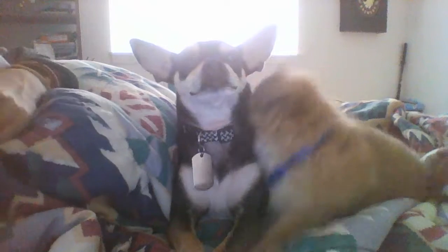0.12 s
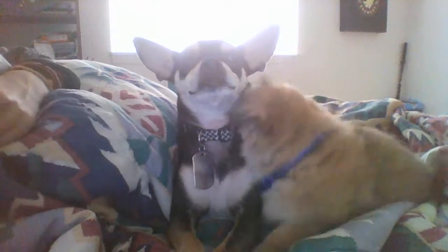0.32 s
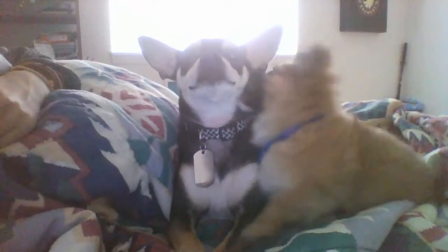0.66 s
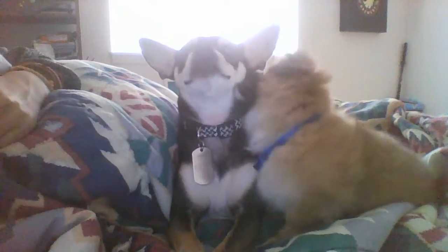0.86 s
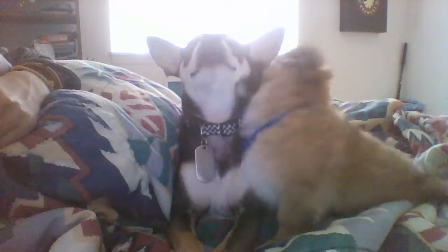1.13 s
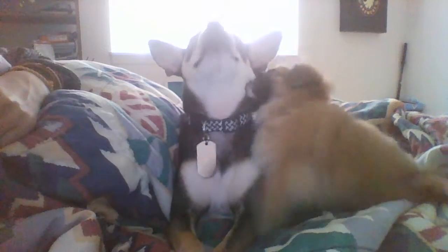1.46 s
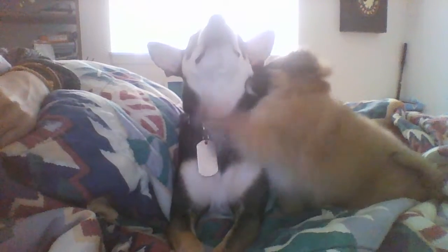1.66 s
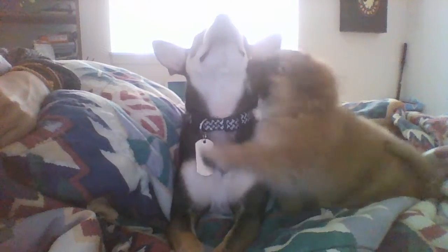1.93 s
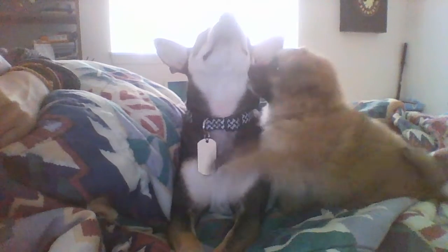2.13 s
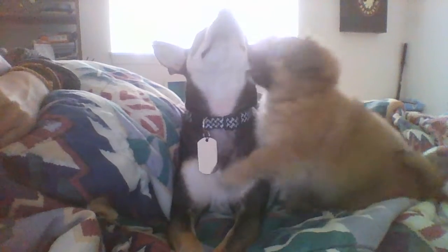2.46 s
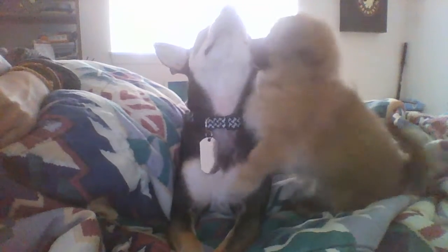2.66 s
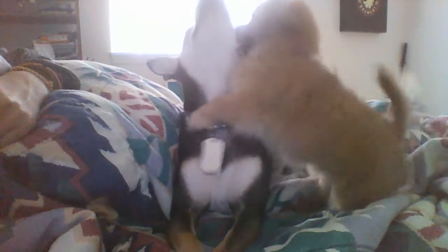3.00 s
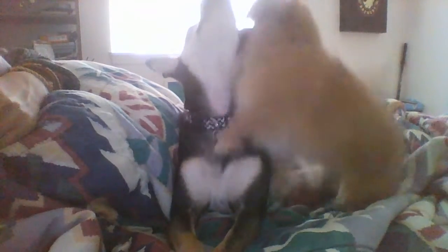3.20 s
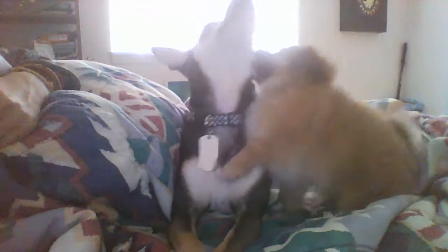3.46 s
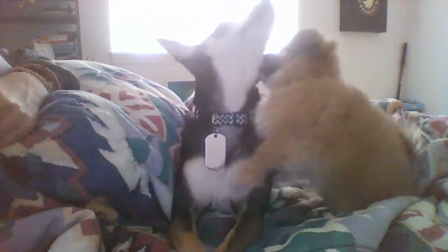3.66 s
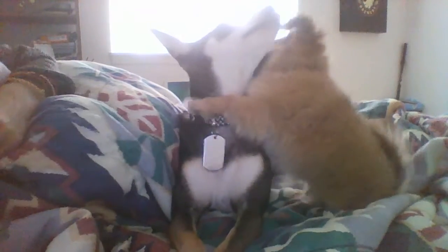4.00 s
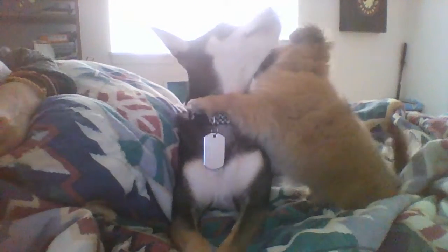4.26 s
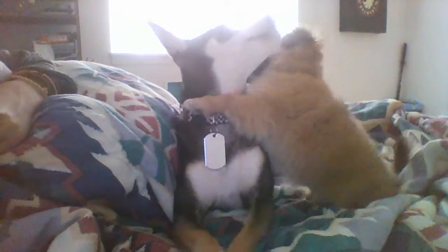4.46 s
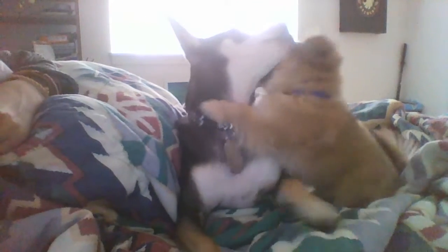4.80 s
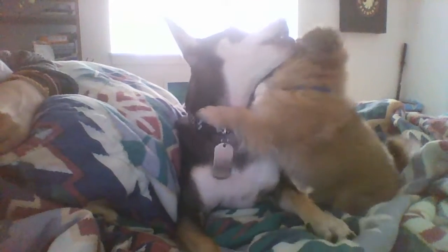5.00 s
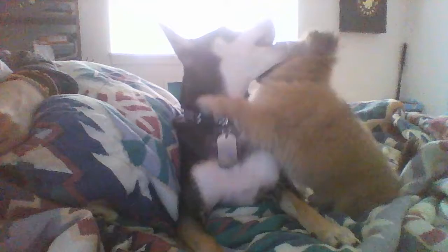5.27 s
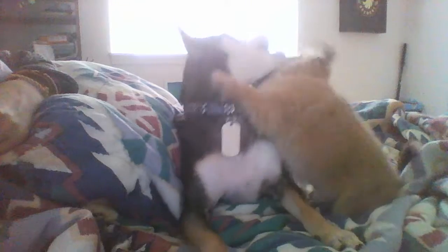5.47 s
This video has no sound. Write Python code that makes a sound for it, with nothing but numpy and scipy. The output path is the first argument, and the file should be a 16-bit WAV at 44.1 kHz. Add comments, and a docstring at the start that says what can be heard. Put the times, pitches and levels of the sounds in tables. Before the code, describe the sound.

Puppy paws thud softly on a bed, then a steel tag jingles hard and briefly amid cloth rustle, snuffling and faint electric whine.

```python
"""Steel tag clinks and bedding

A puppy paws at a dog on a bed, close to a webcam. Low noise rumbles, bedding rustles and paws swing the mattress.
Claws tick as short tone bursts; fur and nose air hiss as coloured noise; a quilt is dragged.
The steel name tag clinks on its ring as decaying plate modes, soon damped by fur.
A faint electric whine beats fifteen times a second; 16 kHz sampling and clipping mark the hardest sounds."""
import sys
import numpy as np
from scipy import signal
from scipy.fft import rfft, irfft, next_fast_len
from scipy.io import wavfile
from scipy.ndimage import uniform_filter1d, map_coordinates

SR = 44100
rng = np.random.default_rng(int(sys.argv[2]) if len(sys.argv) > 2 else 0)


def pcm_store(signal):
    """Save signal as 16-bit PCM."""
    levels = np.round(np.clip(np.atleast_2d(signal), -1, 1) * 32767)
    wavfile.write(sys.argv[1], SR, levels.astype(np.int16).T)


N = 248011


def amp(db):
    """Decibel law: twenty decibels are a factor of ten in amplitude."""
    return 10 ** (np.asarray(db) / 20)


def unit(x):
    """Normalisation to a root-mean-square of 1."""
    return x / np.sqrt(np.mean(x ** 2) + 1e-20)


def along(points, hz):
    """Interpolation of (pitch_hz, value) points along a logarithmic frequency axis."""
    point_hz, value = np.transpose(points)
    return np.interp(np.log(hz + 1), np.log(point_hz + 1), value)


def curves(rows):
    """Linear interpolation in time: one value per sample for each column after start_s."""
    start_s, *columns = np.transpose(rows)
    return [np.interp(np.arange(N) / SR, start_s, column) for column in columns]


def wobble(rate):
    """Slow random modulation: a smooth curve through rate random knots a second."""
    knots = rng.standard_normal(int(N * rate / SR) + 4)
    return map_coordinates(knots, [np.arange(N) * rate / SR])


def filtered(x, response):
    """Linear filtering: the spectrum of x times a response of frequency."""
    m = next_fast_len(N + 8192)
    return irfft(rfft(x, m) * response(np.fft.rfftfreq(m, 1 / SR)), m)[:N]


def noise(spectrum, grain_db, rate, patchy_db):
    """Coloured noise of rms 1: its level flutters, and random gains dapple time and frequency."""
    grains = rng.standard_normal(N) * amp(grain_db * wobble(rate))
    cells = signal.stft(grains, nperseg=512)[2]
    field = uniform_filter1d(rng.standard_normal(cells.shape), size=3, axis=0)
    field = uniform_filter1d(field, size=5, axis=1)
    patchy = signal.istft(cells * amp(patchy_db * unit(field)), nperseg=512)[1][:N]
    return unit(filtered(patchy, lambda hz: amp(along(spectrum, hz))))


def add(track, s, sound):
    """Superposition: mixes a sound into the track at time s."""
    part = track[round(s * SR):][:len(sound)]
    part += sound[:len(part)]


SWELL_BEND = 1.07  # over 1 rounds the top of a swell and steepens its ends


def swell(s, db, rise, fall):
    """Near-exponential growth to a peak at s, then decay; 20 dB per rise or fall time, silent past three."""
    rise, fall, gain = max(rise, .0005), max(fall, .0005), np.zeros(N)
    first = max(round((s - 3 * rise) * SR), 0)
    on = np.arange(first, min(round((s + 3 * fall) * SR), N))
    t = on / SR - s
    gain[on] = amp(db - 20 * np.where(t < 0, -t / rise, t / fall) ** SWELL_BEND)
    return gain


LEAD_S = .025  # from the start of a blip to its peak


def blip(db, hz, half):
    """Tone burst under a Gaussian envelope, slightly rough; half is the time in s to fall to 1/e."""
    t = np.arange(-LEAD_S, LEAD_S, 1 / SR)
    rough = 1 + 1.2 * uniform_filter1d(rng.standard_normal(len(t)), size=25)
    return amp(db) * rough * np.exp(-(t / half) ** 2) * np.cos(2 * np.pi * (hz * t + rng.random()))


# colours of the rumble and of rustling cloth: pitch_hz [Hz], level_db [relative dB per Hz]
RUMBLE_COLOUR = [(18, -64), (30, -29), (70, -28.5), (112, -2), (156, -2), (253, -3.5), (284, -7.5),
                 (331, -2), (373, -12.5), (440, -12), (520, -22), (700, -40), (1100, -120)]
CLOTH_COLOUR = [(300, -35.5), (500, -1.5), (900, -7.5), (1300, -13), (1800, -22), (3000, -32.5)]
# level of the rumble: start_s [s], deep_level_db [dB], upper_level_db [dB]
RUMBLE_LEVELS = [(0.02, -39, -45.5), (0.62, -45.5, -42), (0.89, -37.5, -41), (1.14, -39, -48.5),
                 (1.3, -42, -40.5), (1.57, -49, -50), (1.7, -47, -49), (1.77, -41, -37.5),
                 (1.96, -45.5, -46), (2.3, -47.5, -46), (2.52, -40.5, -38.5), (2.75, -47.5, -48),
                 (2.96, -47, -45), (3.2, -40.5, -44), (3.61, -47, -46.5), (4.12, -50, -53),
                 (4.54, -45, -48.5), (5.15, -49, -49.5), (5.6, -48, -55)]
# rustles as weight shifts: peak_s [s], level_db [dB], rise_20db_s [s], fall_20db_s [s]; times floored by swell
WEIGHT_SHIFTS = [(.22, -48.5, 1.1, .5), (.67, -50, -0.02, .08), (.89, -47.5, 0.23, 0.21),
                 (1.28, -52.5, 0.53, 0.46), (1.52, -58.5, .02, 0.5), (1.728, -46, -0.06, 0.2),
                 (2.0, -56.5, 0.1, .5), (2.38, -52, .02, .2), (2.52, -54.5, 0.04, 1),
                 (2.975, -44, 0.01, 0.1), (3.09, -44.5, 0.09, 0.16), (3.265, -42, 0.1, 0.06),
                 (3.43, -47, 0.04, 0.15), (3.52, -47, 0.09, 0.23), (3.77, -49, 0.1, 0.14),
                 (4.041, -42, .006, .02), (4.058, -42.5, .004, .04), (4.43, -52.5, 0.54, 0.45),
                 (4.6, -46, .1, .05), (4.65, -42, .1, .16), (4.9, -52, .1, 0.37), (5.37, -58, 0.5, 2.5)]
CLOTH_UNDER_DB = -19.5  # the steady rustle lies under the upper rumble
SPLIT_HZ = 220  # between deep and upper rumble


def bed():
    """Band-split noise: a low rumble, with a cloth rustle that follows it and flares when weight shifts."""
    deep, upper = amp(curves(RUMBLE_LEVELS))
    rumble = noise(RUMBLE_COLOUR, grain_db=2.0, rate=18, patchy_db=1.5)
    low = filtered(rumble, lambda hz: 1 / (1 + (hz / SPLIT_HZ) ** 6))
    cloth = amp(CLOTH_UNDER_DB) * upper + sum(swell(*shift) for shift in WEIGHT_SHIFTS)
    rustle = cloth * noise(CLOTH_COLOUR, grain_db=2, rate=60, patchy_db=1.5)
    return deep * unit(low) + upper * unit(rumble - low) + rustle


# strength of the whine, before its random wavering: start_s [s], level_db [rms dB]
WHINE_LEVELS = [(0, -64.5), (.9, -61), (1.6, -67), (2.5, -61.5), (3.4, -68), (4.2, -61), (4.9, -65),
                (5.62, -70)]
# colour of the hiss: pitch_hz [Hz], level_db [relative dB per Hz]
HISS_COLOUR = [(300, -23.5), (700, 2), (1500, 3), (2600, 0.5), (4500, -2.5), (6600, -0.5), (7700, -13.5)]
BEAT_HZ, BEAT_AT_S = 14.97, -.0037  # beats a second, time of one beat's peak


def electronics():
    """Beating by amplitude modulation: a cubed cosine cuts a tone into short beeps over preamp hiss."""
    t = np.arange(N) / SR
    beat = np.cos(np.pi * BEAT_HZ * (t - BEAT_AT_S))
    beeps = beat * np.abs(beat) ** 2 * np.sin(2 * np.pi * 2857 * t + .7 * wobble(40))
    strength = amp(curves(WHINE_LEVELS)[0] + 1.6 * wobble(14))
    hiss = amp(-55.5 + 0.3 * wobble(4.4)) * noise(HISS_COLOUR, grain_db=0.1, rate=48, patchy_db=3)
    return strength * unit(beeps) + hiss


# paws on the mattress: start_s [s], level_db [peak dB], pitch_hz [Hz], length_s [s]
PAW_THUMPS = [(0.166, -25, 254, 0.021), (0.35, -41, 132, 0.018), (0.418, -32.5, 202, 0.039),
              (0.645, -27.5, 132, 0.048), (0.702, -26, 168, 0.028), (0.882, -20.5, 151, 0.032),
              (0.973, -25.5, 150, 0.053), (1.081, -32, 187, 0.057), (1.209, -23.5, 150, 0.028),
              (1.307, -31, 137, 0.042), (1.722, -36, 208, 0.041), (1.792, -24.5, 223, 0.019),
              (2.123, -32.5, 141, 0.04), (2.372, -34, 270, 0.03), (2.475, -30, 131, 0.027),
              (2.883, -33, 155, 0.035), (2.978, -31, 167, 0.031), (3.108, -30, 142, 0.061),
              (3.218, -30.5, 131, 0.054), (3.462, -39.5, 197, 0.06), (3.684, -32.5, 130, 0.035),
              (4.043, -31, 196, 0.014), (4.319, -34.5, 135, 0.059), (4.528, -31.5, 136, 0.061),
              (4.88, -36, 138, 0.064), (5.29, -30.5, 135, 0.039)]


def thumps():
    """Heavily damped oscillation: the mattress swings a few cycles under each paw."""
    out = np.zeros(N)
    for s, db, hz, length in PAW_THUMPS:
        t = np.arange(0, length, 1 / SR)
        envelope = np.sin(np.pi * (t / length) ** 0.56) ** 2  # peaks before the middle
        add(out, s, amp(db) * envelope * np.sin(2 * np.pi * (hz * t + rng.random())))
    return out


# claw and ring ticks and low tag rings, before roughening: peak_s [s], level_db [dB], pitch_hz [Hz],
# half_length_s [s]
SHORT_BURSTS = [(.6435, -30, 6300, .0003), (.6455, -30, 4700, .0012), (.6455, -35, 5400, .0015),
                (.728, -39, 5550, .004), (.728, -47, 2050, .007), (.742, -47, 2000, .006),
                (.738, -49, 3700, .006), (.75, -50, 2600, .006), (.748, -38, 5750, .003),
                (.756, -37, 5350, .004), (.763, -39, 5150, .003), (1.8088, -8, 6800, .0004),
                (3.308, -12, 7300, .0015), (0.769, -31.5, 5200, .002), (1.7229, -19, 4500, .00012),
                (1.813, -19, 3990, 0.0035), (1.83, 0, 6010, 0.00037), (1.8323, -13.5, 5900, .001),
                (1.879, -26.5, 4000, .001), (1.8795, -21, 6000, .0004), (2.3612, -15, 5900, .0006),
                (2.3626, -15, 7000, .0008), (2.3643, -15, 5900, .0005), (2.3779, -7, 5500, .0003),
                (2.3779, -11, 3900, .0004), (2.3779, -24, 2500, .0003), (2.363, -30, 4300, .001),
                (2.387, -27, 4550, .0008), (2.394, -24, 5300, .001), (3.223, -16.5, 5600, .001),
                (3.2262, -13.5, 5800, .001), (3.2279, -17.5, 6220, .0007), (3.2323, -8.5, 5600, .0008),
                (3.237, -9.5, 5450, .001), (3.2514, -19, 4630, .0015), (3.264, -23.5, 4000, .003),
                (3.272, -20, 4050, .003), (3.326, -3.5, 6680, 0.00043), (3.39, -25.5, 6500, .0004),
                (3.75, -35, 6260, .002), (3.761, -36.5, 6240, 0.0027), (4.0363, -35, 5700, .001),
                (4.04, -31.5, 2800, .0005), (4.0455, -31.5, 3600, .0008), (4.0555, -27.5, 2400, .0008),
                (4.0452, -19, 5700, 0.00055), (4.0575, -11, 5600, .001), (4.036, -42, 3000, .0003),
                (4.049, -30, 7300, .002), (4.0453, -25.5, 2350, .0012), (4.418, -33, 5800, .00015),
                (4.67, -39, 4000, .0002)]
# small hollow knocks, before roughening: peak_s [s], level_db [dB], half_length_s [s]
HOLLOW_KNOCKS = [(2.977, -32.5, 0.0022), (3.774, -37.5, .002), (4.039, -28.5, 0.00023),
                 (4.046, -31.5, .001), (4.056, -28, .001), (4.452, -40, 0.0013), (4.643, -29, 0.0059),
                 (4.666, -37, .003), (4.673, -31, .004), (4.723, -48, 0.0027)]
KNOCK_HZ = 1268


def bursts():
    """Impulsive excitation in short bursts: claw and ring ticks, low tag rings, hollow knocks."""
    out = np.zeros(N)
    for s, db, hz, half in SHORT_BURSTS:
        add(out, s - LEAD_S, blip(db, hz, half))
    for s, db, half in HOLLOW_KNOCKS:
        add(out, s - LEAD_S, blip(db, KNOCK_HZ, half))
    return out


# hissing fur strokes, with narrow rings after clinks and a nose resonance: peak_s [s],
# level_db [rms dB at the peak], rise_20db_s [s], fall_20db_s [s], centre_hz [Hz], narrow_share [0-1]
HISSES_AND_RINGS = [(.648, -46, .003, .2, 4800, .4), (.70, -52, .03, .04, 6200, .8),
                    (.735, -42, .03, .06, 5600, .8), (.755, -42, .04, .03, 5350, .8),
                    (.775, -45, .01, .12, 5250, .7), (.828, -54, .03, .07, 4700, .9),
                    (1.735, -42, .006, .08, 5600, .1), (1.825, -41, .012, .2, 4000, 1),
                    (1.91, -48, .05, .2, 4810, 1), (1.93, -50, .05, .08, 6540, 1),
                    (1.838, -36, .002, .09, 5600, .2), (1.85, -40, .02, .08, 6540, .9),
                    (1.884, -43, .002, .07, 5700, .2), (1.915, -48, .04, .08, 6200, .3),
                    (2.36, -40, .012, .03, 6200, .2), (2.38, -28, .002, .03, 5550, .2),
                    (2.385, -35, .003, .065, 3900, .3), (2.395, -33, .01, .055, 5650, .1),
                    (2.425, -45, .03, .035, 6200, .2), (2.49, -55, .05, .1, 5200, .8),
                    (2.555, -48, .1, .08, 4900, .4), (3.045, -39, .004, .06, 5800, .5),
                    (3.09, -31, .07, .09, 5900, .1), (3.11, -37, .06, .1, 4500, .3),
                    (3.13, -35, .06, .05, 5400, .6), (3.15, -46, .06, .03, 7100, .9),
                    (3.155, -41, .06, .025, 5700, .1), (3.372, -46, .03, .03, 2400, 1),
                    (3.222, -25.5, .008, .05, 5895, .4), (3.244, -21, .0057, .04, 6330, .2),
                    (3.266, -27, .04, .02, 4050, .8), (3.335, -30, .01, .06, 6300, .2),
                    (3.395, -38, .01, .06, 6310, .2), (3.42, -38, .05, .08, 4900, .3),
                    (3.49, -41, .08, .07, 5100, .7), (3.765, -44, .02, .09, 6600, .3),
                    (4.075, -45, .01, .07, 5600, .1), (4.115, -51, .06, .035, 5600, .1),
                    (4.08, -50, .01, .09, 4200, 1), (4.1, -50, .05, .06, 7200, .9)]


def hisses_and_rings():
    """Noise shifted to a centre frequency: broad for fur strokes, narrow for clink rings and a nose resonance."""
    # (Hz from the centre, relative dB)
    brush = [(100, -1.0), (350, -3.5), (800, -8.5), (1600, -15.5), (3000, -32.0)]
    whistle = [(50, -1.0), (170, -9), (400, -24), (1200, -45)]
    # complex noise, so that the two sides of the centre differ
    broad, narrow = (noise(shape, grain_db=grain_db, rate=rate, patchy_db=2.5)
                     + 1j * noise(shape, grain_db=grain_db, rate=rate, patchy_db=2.5)
                     for shape, grain_db, rate in ((brush, 1.8, 90), (whistle, 1.2, 140)))
    out = np.zeros(N)
    for *shape, hz, share in HISSES_AND_RINGS:
        gain = swell(*shape)
        on = np.flatnonzero(gain)
        mix = np.sqrt(1 - share) * broad[on] + np.sqrt(share) * narrow[on]
        add(out, on[0] / SR, gain[on] * np.real(mix * np.exp(2j * np.pi * hz * on / SR)))
    return out


# air through the puppy's nose, one list a bout: start_s [s], level_db [rms dB]
SNUFFLE_BOUTS = [
    [(.7, -57.5), (.725, -53), (.75, -54), (.775, -63)],
    [(3.04, -62), (3.052, -41), (3.075, -30), (3.09, -30), (3.13, -30), (3.18, -35), (3.215, -35),
     (3.23, -32), (3.248, -34), (3.262, -29), (3.29, -35), (3.303, -41), (3.33, -50), (3.356, -52),
     (3.378, -45), (3.392, -52), (3.402, -39), (3.425, -36), (3.45, -41), (3.485, -47), (3.515, -45),
     (3.562, -57), (3.6, -44), (3.66, -62)],
]
# colour of the nose air: pitch_hz [Hz], level_db [relative dB per Hz]
NOSE_COLOUR = [(900, -36), (1300, -22), (1600, -14), (1900, -5), (2120, -4), (2310, 5), (2520, -2),
               (2800, -6), (3300, -8), (3900, -18), (4700, -13), (6900, -13), (7700, -23)]


def snuffle():
    """Turbulent flow noise: air in the puppy's nose, coloured and shaped by the breath."""
    t = np.arange(N) / SR
    breath = sum(amp(np.interp(t, *np.transpose(bout), left=-120, right=-120)) for bout in SNUFFLE_BOUTS)
    return breath * noise(NOSE_COLOUR, grain_db=1.8, rate=70, patchy_db=2.5)


# blows on the tag, before the 1 dB lift and the sway: start_s [s], second_mode_level_db [dB],
# third_mode_level_db [dB], fourth_mode_level_db [dB], free_ring_s [s], damped_t60_s [s]
TAG_BLOWS = [(1.7283, -16, -26, -30, .007, .025), (1.74, -36, -44, -48, .028, .04),
             (1.7815, -27, -40, -40, .003, .02), (1.7863, -14, -20, -24, .004, .03),
             (1.8025, -22, -24, -24, .003, .02), (1.8055, -14, -12, -22, .004, .03),
             (1.8092, -9, -12, -15, .012, .09), (1.8285, -23, -27, -27, .02, .05),
             (2.9742, -17, -20, -18, .004, .05), (3.0396, -32, -33, -50, .012, .05),
             (3.062, -33, -29, -48, .014, .04), (3.0903, -22, -26, -45, .012, .05),
             (3.2426, -13, -12, -18, .009, .028), (3.256, -27, -38, -38, .025, .04),
             (3.3067, -7, -20, -10, .008, .035), (3.321, -13, -24, -25, .004, .02),
             (3.3258, -10, -16, -18, .004, .02), (3.329, -6, -30, -28, .018, .045),
             (3.333, -14, -36, -40, .012, .03), (3.3722, -13, -46, -62, .011, .02),
             (3.397, -33, -44, -50, .022, .05), (3.428, -35, -48, -58, .018, .04),
             (3.464, -36, -46, -42, .012, .03), (3.482, -27, -52, -44, .012, .04),
             (3.503, -39, -60, -65, .025, .05), (3.622, -53, -65, -70, .015, .04),
             (4.0475, -27, -40, -45, .004, .015), (4.0515, -40, -26, -30, .003, .015),
             (4.0557, -6, -18, -18, .008, .018), (4.0592, -30, -9, -19, .003, .04),
             (4.07, -38, -25, -45, .015, .15), (4.097, -43, -38, -58, .013, .03),
             (4.122, -45, -48, -62, .022, .02), (4.148, -62, -49, -70, .04, .04)]
# the tag's four modes: pitch_hz [Hz], free_t60_s [s]
TAG_MODES = [(3995, 0.06), (4808, 0.21), (6540, 0.14), (7535, 0.068)]
# weaker modes woken with a neighbour: neighbour_index [from 0], pitch_hz [Hz],
# level_db [dB relative to the neighbour], free_t60_s [s]
TWIN_MODES = [(1, 4960, -14, .06), (3, 7415, -6, .04), (2, 5540, -9, .035), (2, 5870, -11, .04),
              (1, 4620, -18, .06), (3, 6810, -6, .04), (0, 4194, -3, .04), (3, 7163, -14, .12)]
# hard blows favour the lowest mode: its level at a 0 dB blow, dB gained per dB of blow
LOW_DB, LOW_GROWS = -12.5, 2.1
# attack time constant at 0 dB, and its growth per dB below: weaker clinks are given a softer onset
ATTACK_S, ATTACK_PER_DB_S = .0002, .00004
# crack of steel on steel: dB over the fourth mode's table level, centre Hz, half length s
CRACK_DB, CRACK_HZ, CRACK_S = 2, 6200, .0006


def tag():
    """Modal vibration: each blow rings the plate freely for a moment, until fur damps it."""
    out, t = np.zeros(N), np.arange(SR // 6) / SR
    # the swinging plate turns its faces, so each mode flickers in strength and phase
    sway = [(amp(1.2 * wobble(150)), .6 * wobble(110)) for _ in TAG_MODES + TWIN_MODES]
    bright = signal.butter(3, [4200, 7600], "bandpass", fs=SR)
    for s, *upper_db, free, t60 in TAG_BLOWS:
        blow_db = max(upper_db)
        mode_db = [LOW_DB + LOW_GROWS * blow_db, *upper_db]
        twins = ((mode_db[k] + over_db, (hz, life)) for k, hz, over_db, life in TWIN_MODES)
        modes = [*zip(mode_db, TAG_MODES), *twins]
        attack = 1 - np.exp(-t / (ATTACK_S - ATTACK_PER_DB_S * blow_db))
        damping = amp(-60 * np.maximum(t - free, 0) / max(t60, .005)) * attack
        # a new blow joins the swing that is already under way
        now = np.minimum(round(s * SR) + np.arange(len(t)), N - 1)
        ring = sum(amp(level + 1.0 - 60 * t / life) * gain[now]
                   * np.sin(2 * np.pi * hz * now / SR + phase[now])
                   for (level, (hz, life)), (gain, phase) in zip(modes, sway))
        rattle_gain = amp(max(mode_db) - 8.0 - 60 * t / 0.046)
        rattle = rattle_gain * signal.lfilter(*bright, rng.standard_normal(len(t)))
        add(out, s, damping * (ring + rattle))
        # the crack peaks one half length after the blow
        add(out, s + CRACK_S - LEAD_S, blip(CRACK_DB + mode_db[-1], CRACK_HZ, CRACK_S))
    return out


# bright drags on the quilt: peak_s [s], level_db [dB], rise_20db_s [s], fall_20db_s [s]; times floored by swell
QUILT_DRAGS = [(2.385, -42, -0.03, 0.13), (2.425, -50.5, -0.03, .06), (3.085, -41, 0.05, 0.1),
               (3.13, -41, 0.06, 0.06), (3.19, -45, .06, .06), (3.228, -35, 0.0253, 0.05),
               (3.265, -35, 0.0454, .04), (3.3, -43, 0.04, 0.01), (3.4, -46.5, .03, .03),
               (3.428, -41, .04, .04), (3.5, -50, 0.1, -0.02), (4.41, -49, -0.04, 0.13),
               (4.59, -47, .14, .08), (4.63, -46, .06, .06), (4.675, -45, .06, .1)]
# colour of the quilt: pitch_hz [Hz], level_db [relative dB per Hz]
QUILT_COLOUR = [(590, -34), (1000, -6.5), (2440, -10.5), (2940, -2.5), (3950, -9), (6750, -14.5),
                (7600, -25.5), (9880, -57.5), (16700, -120)]


def drags():
    """Sliding friction: a paw dragged over the quilt makes bright swells of noise."""
    gain = sum(swell(*drag) for drag in QUILT_DRAGS)
    return gain * noise(QUILT_COLOUR, grain_db=2.1, rate=120, patchy_db=3.0)


# decay of the room: pitch_hz [Hz], t60_s [s]
ROOM_DECAY = [(1000, .2), (4000, 0.16), (7500, 0.076)]


def room(x):
    """Frequency-dependent reverberation; its random tail is redrawn every tenth of a second, so it stays noisy."""
    out, step = np.zeros(N), SR // 10
    for start in range(0, N, step):
        hz, t, cells = signal.stft(rng.standard_normal(SR // 4), SR, nperseg=256)
        decay = amp(-60 * t / along(ROOM_DECAY, hz)[:, None])
        tail = signal.istft(cells * decay, SR, nperseg=256)[1]
        answer = signal.fftconvolve(x[start:start + step], tail / np.linalg.norm(tail))
        add(out, (start + 200) / SR, answer)  # 200 samples after the direct sound
    return out


def scene():
    """Superposition of every source, with the room's answer to the hits, at the single microphone."""
    hits = tag() + bursts()
    steady = bed() + electronics()
    rubs = hisses_and_rings() + snuffle() + drags()
    return (hits + amp(-21) * room(hits) + thumps() + rubs + steady)[None]


DUCK_DB, DUCK_RECOVER_S = 58.5, 0.076  # dB lost per unit of recent power, time constant of its memory


def gain_control(x):
    """Automatic gain control: the webcam turns itself down, by up to 16 dB, after loud sounds."""
    keep = np.exp(-1 / (DUCK_RECOVER_S * SR))
    recent_power = signal.lfilter([1 - keep], [1, -keep], x ** 2)
    return x * amp(-np.clip(DUCK_DB * recent_power, 0, 16))


def clip(x, top, hardness):
    """Saturation: rounds off peaks near top."""
    return x / (1 + np.abs(x / top) ** hardness) ** (1 / hardness)


SAMPLE_HZ, EDGE_HZ, TOP_HZ = 16000, 7600, 8931  # sampling rate, edge of the band, top of the mirror image
CLIP_TOP_HZ = 15700  # top of the clipping spray


def record(dry):
    """Saturation and aliasing: loud peaks clip, and sampling leaves a weak mirror of the top treble."""
    x = clip(gain_control(dry[0]), .91, 10)
    # the small microphone loses the deep bass
    band = filtered(x, lambda hz: hz ** 2 / (hz ** 2 + 30 ** 2) / (1 + (hz / EDGE_HZ) ** 300))
    folded = band * np.cos(2 * np.pi * SAMPLE_HZ * np.arange(N) / SR)
    mirror = filtered(folded, lambda hz: (hz > SAMPLE_HZ / 2) * (hz < TOP_HZ)
                      * amp(along([(8400, -8), (8900, -15.5)], hz)))
    # peaks that touch full scale once more spray a faint spark above the band
    sparked = clip(band + mirror, .99, 13)
    return filtered(sparked, lambda hz: (hz < CLIP_TOP_HZ)
                    * amp(along([(TOP_HZ, 0), (CLIP_TOP_HZ, -14)], hz)))[None]


dry = scene()
out = record(dry)
pcm_store(out)
```